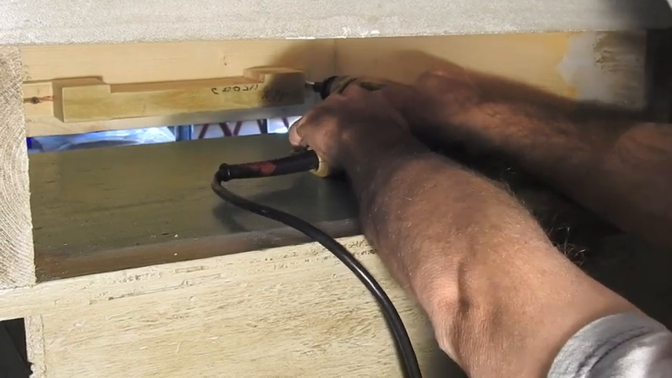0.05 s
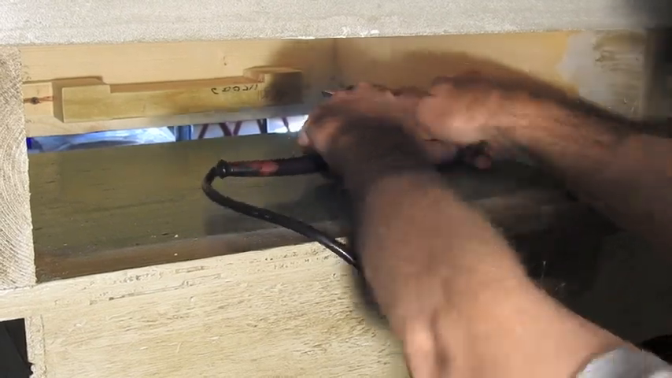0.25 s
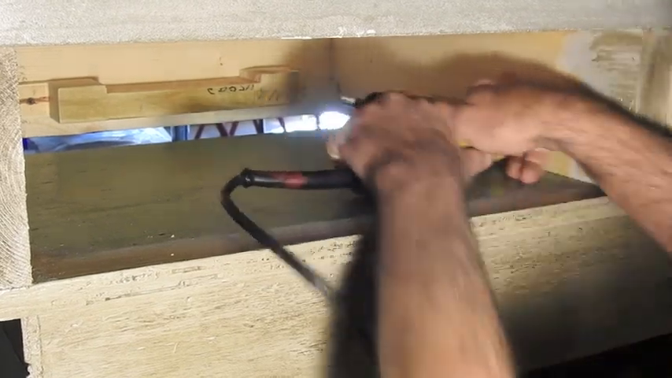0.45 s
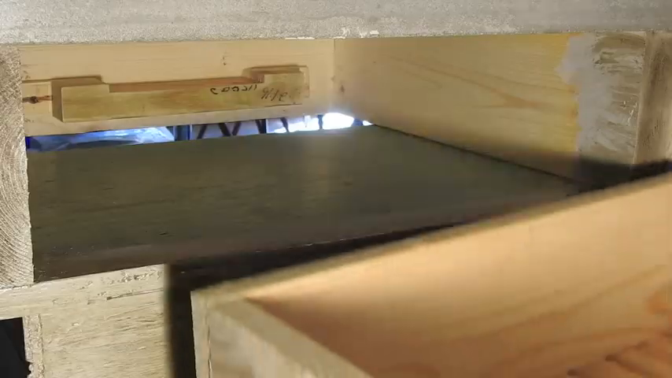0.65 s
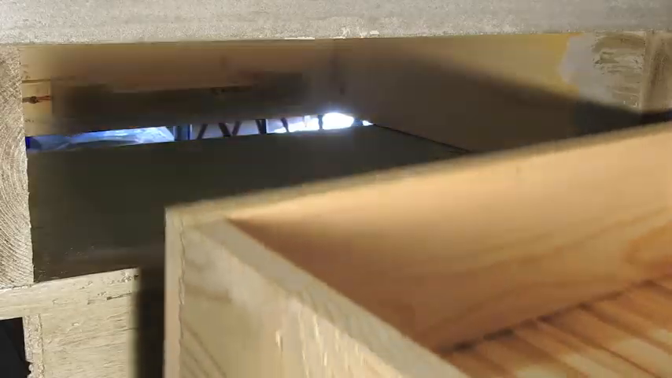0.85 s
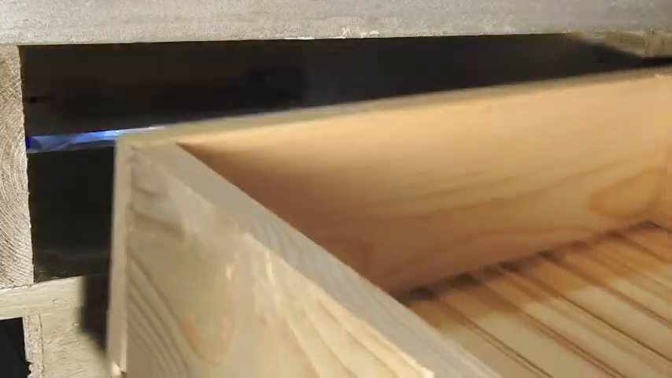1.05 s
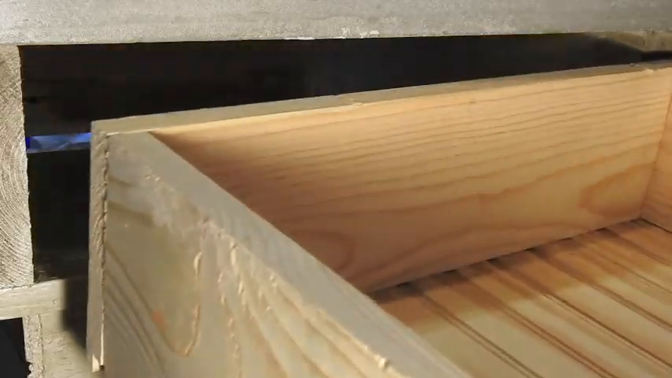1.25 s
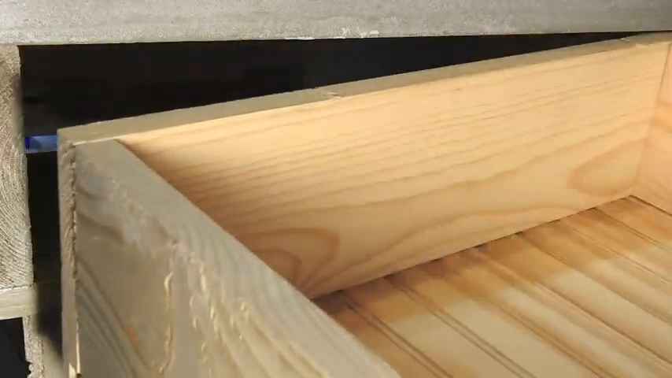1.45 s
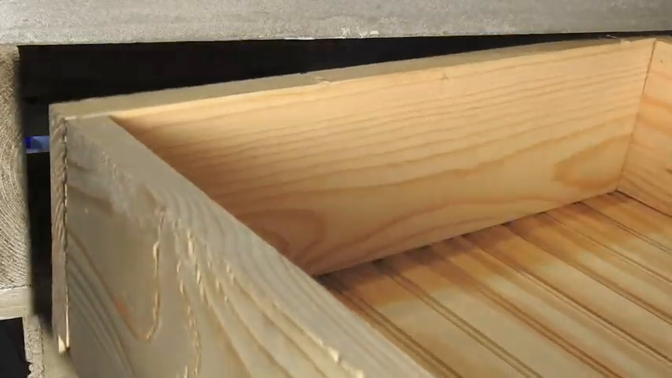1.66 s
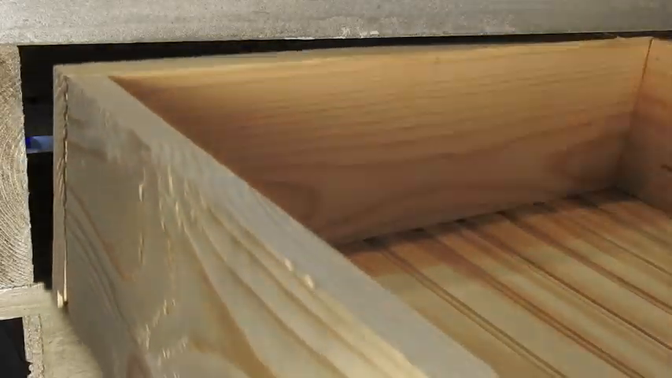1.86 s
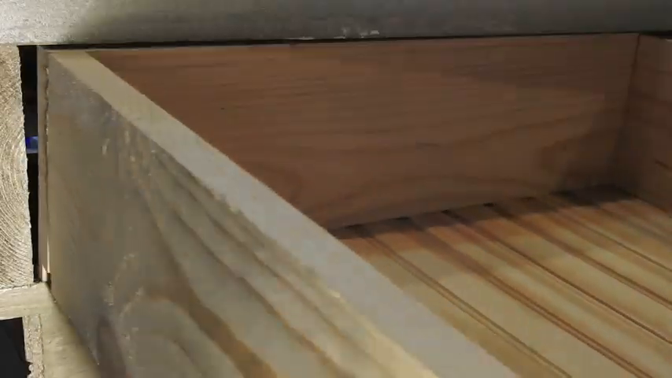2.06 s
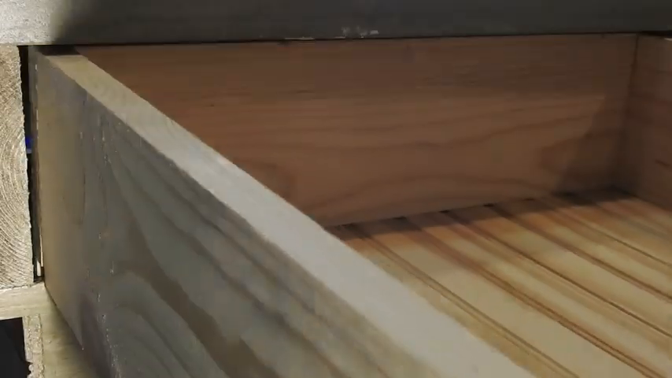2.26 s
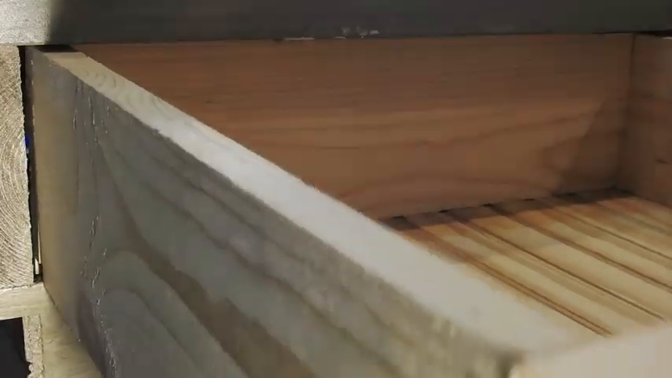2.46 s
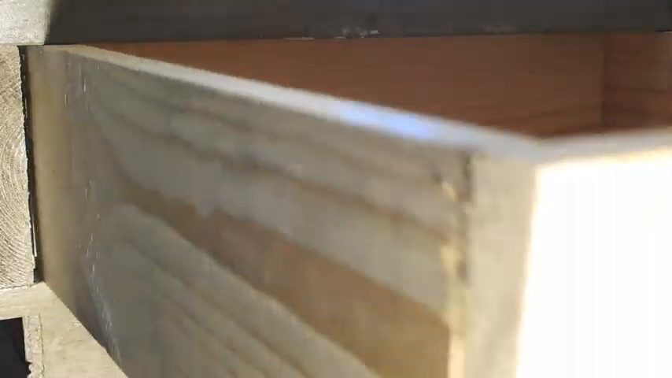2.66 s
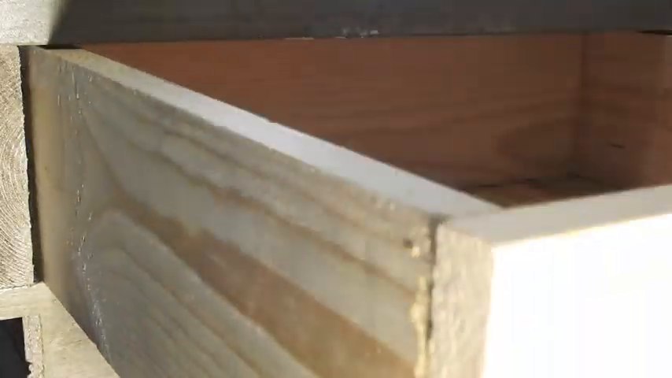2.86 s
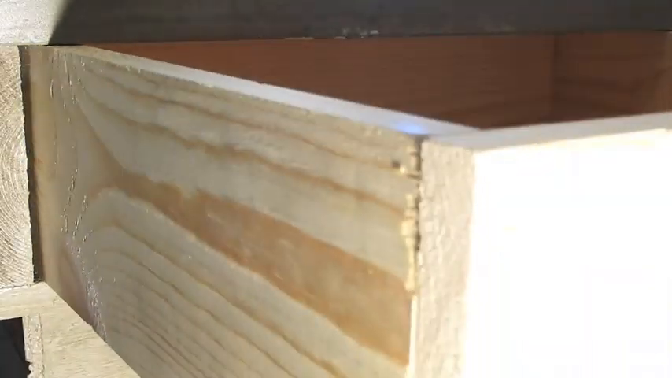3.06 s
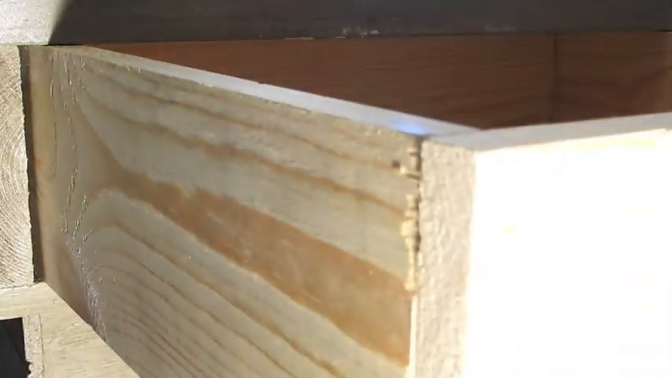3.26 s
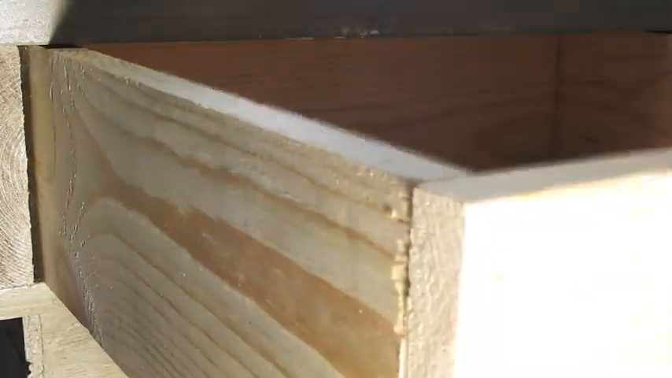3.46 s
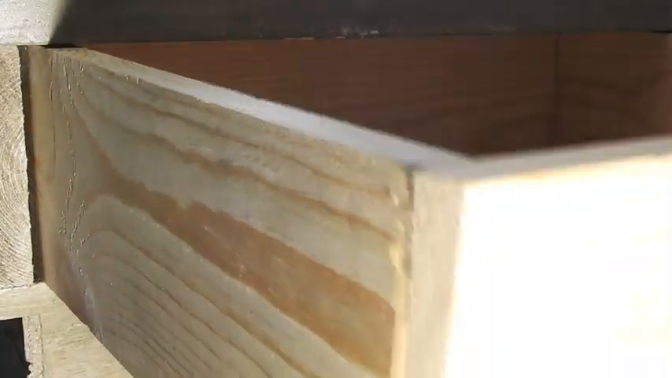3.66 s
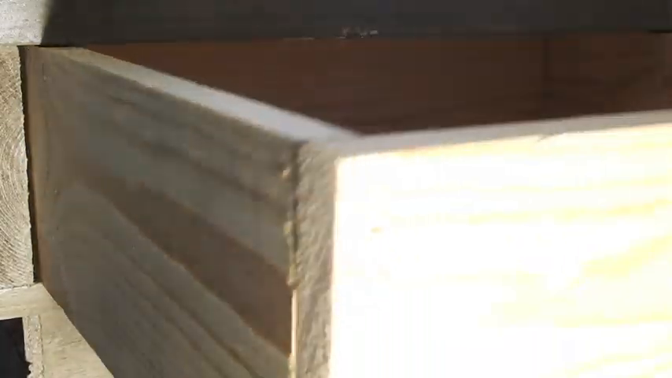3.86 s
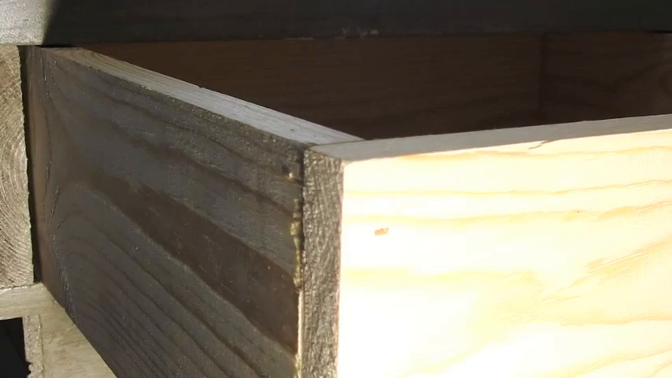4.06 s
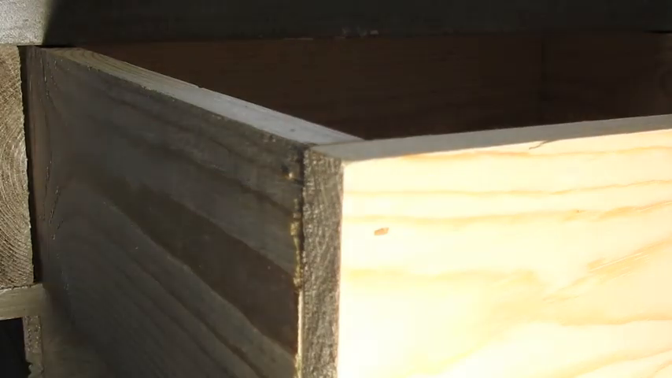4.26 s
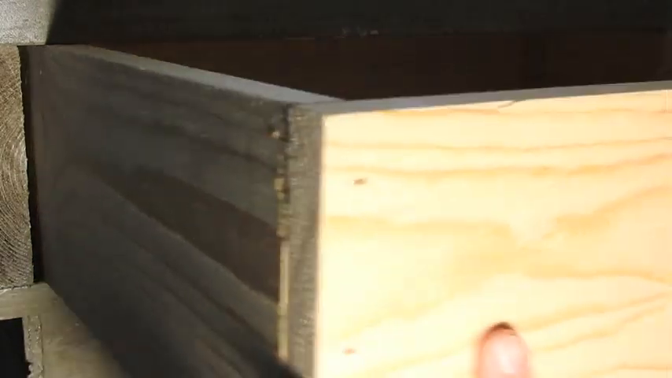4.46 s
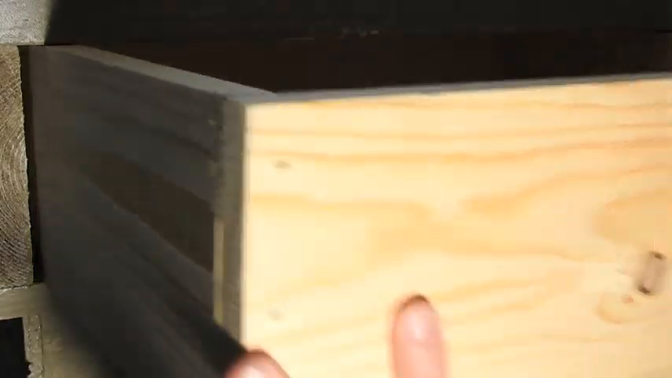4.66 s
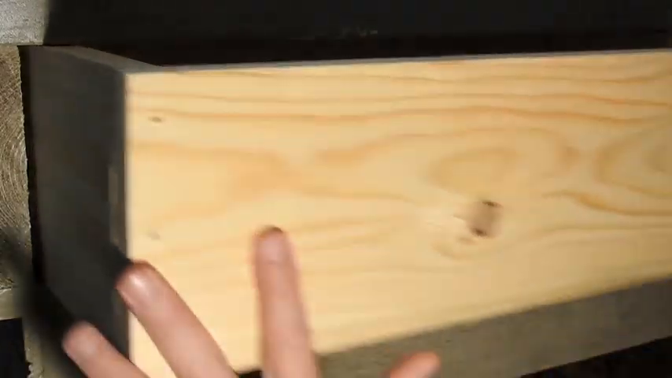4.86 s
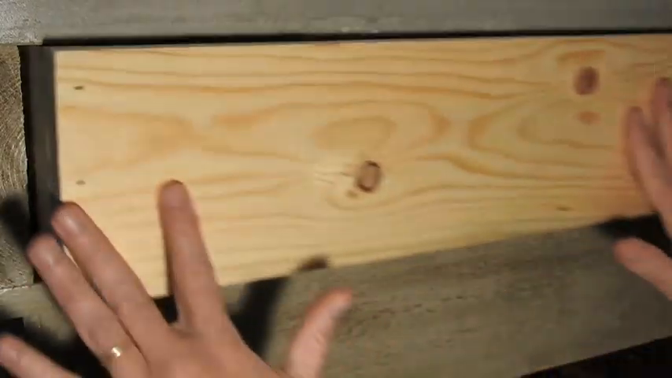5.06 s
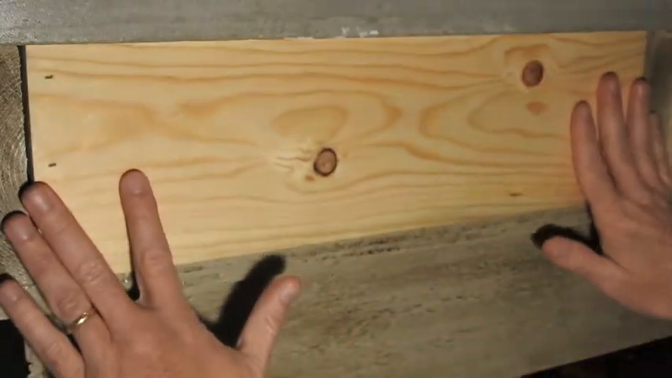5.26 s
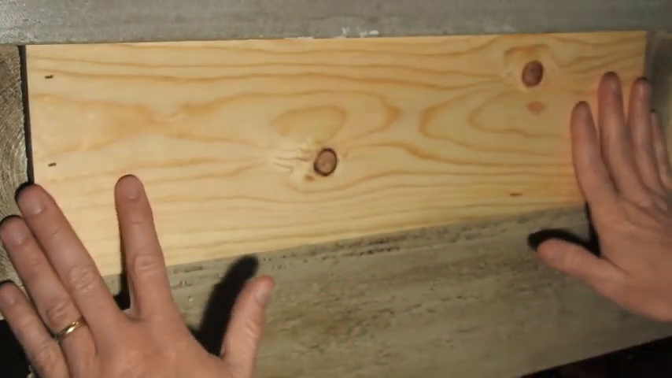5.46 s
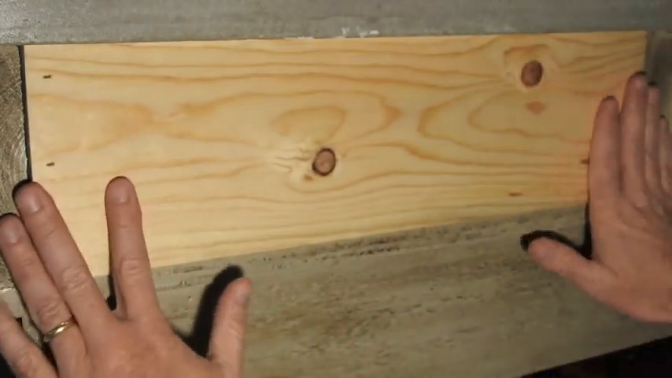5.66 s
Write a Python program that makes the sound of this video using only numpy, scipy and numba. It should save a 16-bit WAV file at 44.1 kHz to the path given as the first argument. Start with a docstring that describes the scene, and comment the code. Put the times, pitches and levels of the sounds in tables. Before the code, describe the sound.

A tool clatters and scrapes briefly inside a wooden frame, and the sound drops out for an instant. After a short lull, a wooden drawer bumps against its opening with hollow, boomy knocks. It is then pushed in through a run of jerky strokes, rubbing with a grainy hiss and knocking repeatedly until it is home. The microphone is close, in a quiet workshop with a faint low hum.

```python
"""A quiet workshop: a tool clatters inside a wooden frame and the sound briefly drops out;
then a wooden drawer is bumped and pushed home.
Knocks and stick-slip rubbing ring the hollow box, its boards and its edges; the bench thuds below.
Rough grain hisses as the wood is rubbed, over workshop air with a low hum.
A small stereo microphone with a quick limiter stands close by."""
import sys
import numpy as np
from scipy import signal
from scipy.fft import rfft, irfft, next_fast_len
from scipy.io import wavfile
from scipy.ndimage import uniform_filter1d
from numba import njit

SR = 44100
rng = np.random.default_rng(int(sys.argv[2]) if len(sys.argv) > 2 else 0)


def bounce(signal):
    """Save signal as a 16-bit WAV file at the path given by the first command-line argument."""
    frames = np.transpose(np.atleast_2d(signal))
    limited = np.clip(frames, -1, 1)
    pcm = np.round(limited * 32767).astype(np.int16)
    wavfile.write(sys.argv[1], SR, pcm)


N = 252336
TIME_S = np.arange(N) / SR


def undb(db):
    return 10 ** (np.asarray(db) / 20)


def unit_rms(x):
    return x / np.sqrt(np.mean(x ** 2))


def colour(x, points):
    """Filter by (freq_hz, gain_db) points."""
    hz, db = np.transpose(points)
    size = next_fast_len(len(x))
    bins_hz = np.maximum(np.arange(size // 2 + 1) * SR / size, 1)
    gain = undb(np.interp(np.log(bins_hz), np.log(hz), db))
    return irfft(rfft(x, size) * gain, size)[:len(x)]


def walk(rate_hz):
    """Random levels joined by ramps; spread near 1."""
    step = int(SR / rate_hz)
    return uniform_filter1d(np.repeat(rng.standard_normal(N // step + 1), step), step)[:N]


@njit
def bandpass(x, centre_hz, width_hz):
    """Resonant band with a moving centre."""
    y, band, low = np.empty(len(x)), 0., 0.
    for i in range(len(x)):
        g, damping = np.tan(np.pi * centre_hz[i] / SR), width_hz / centre_hz[i]
        v = (band + g * (x[i] - low)) / (1 + g * (g + damping))
        band, low, y[i] = 2 * v - band, low + 2 * g * v, damping * v
    return y


def soften(x, push_s):
    """Contact spreads each impulse into a short push."""
    return signal.lfilter(np.hanning(int(push_s * SR) + 3), 1, x)


def slips(rate_hz, spread_db, push_s):
    """Stick-slip force: irregular jerks of uneven size."""
    chance, size, sign = rng.random(N), rng.exponential(1, N), np.sign(rng.standard_normal(N))
    jerks = (chance < rate_hz / SR) * undb(spread_db * np.minimum(size, 2.5)) * sign
    return unit_rms(soften(jerks, push_s))


def rubbed(modes, force, wander_db):
    """Jerks ring damped modes; each mode's share wanders as the contact point moves."""
    out = np.zeros(N)
    for hz, db, t60_s in modes:
        r, w = np.exp(-np.log(1000) / (t60_s * SR)), 2 * np.pi * hz / SR
        drive = force * undb(wander_db * walk(15))
        ring = signal.lfilter([0, r * np.sin(w)], [1, -2 * r * np.cos(w), r * r], drive)
        out += undb(db) * ring / np.sqrt(t60_s)
    return unit_rms(out)


# carcass modes: pitch_hz, level_db, t60_s
CARCASS_MODES = [(111.5, -6.5, 0.99), (138.8, -2.5, 0.2), (210, -9, 0.21)]


def hollow_boom(judder, pitch_hz):
    """Judder rings the hollow of the box and its carcass."""
    hollow = unit_rms(bandpass(bandpass(judder, pitch_hz, 46.), pitch_hz, 210.))
    return unit_rms(hollow + undb(-6.5) * rubbed(CARCASS_MODES, judder, wander_db=2.7))


# bench modes: pitch_hz, level_db, t60_s
BENCH_MODES = [(67, -26.5, 0.87), (71.94, 11.5, 0.94), (74, -12, 0.9)]


def bench_thud():
    """Soft jerks ring the bench under the frame."""
    return rubbed(BENCH_MODES, slips(1500, 0.65, 0.003), wander_db=1.5)


# broad board modes: pitch_hz, level_db, t60_s
BOARD_MODES = [(283, 0.5, 0.32), (343, 4.5, 0.22), (426, -9, 0.29), (480, -1.5, 0.12), (524.5, 3, 0.091),
               (573.4, -3, 0.13), (665.7, -8, 0.12)]


def board_ring(rumble, lead_hz, lead_db):
    """The boards ring together with a moving band for the one under the hand."""
    others = rubbed(BOARD_MODES, rumble, wander_db=4.4)
    lead = undb(lead_db) * unit_rms(bandpass(rumble, lead_hz, 65.))
    return (others + lead) / np.hypot(1, undb(lead_db))


# stiff edge modes: pitch_hz, level_db, t60_s
EDGE_MODES = [(851, 0, 0.092), (905, -2.5, 0.11), (1094.6, -3.5, 0.2), (1258, 1, 0.027), (1484, 1, 0.031),
              (1610, -3.5, 0.041), (1838, -6.5, 0.07), (2170, -10, 0.1), (2465, -20.5, 0.067),
              (2770, -7, 0.07)]


def edge_ring(chatter):
    """Chatter rings the edges; a broad band stands for their many faint modes."""
    faint = bandpass(bandpass(chatter, np.full(N, 1500.), 1600.), np.full(N, 1700.), 2100.)
    return unit_rms(rubbed(EDGE_MODES, chatter, wander_db=4.5) + undb(-1.5) * unit_rms(faint))


# thin panel modes: pitch_hz, level_db, t60_s
PANEL_MODES = [(979.7, 4, 0.15), (987, -7, 0.067), (1034, -19, 0.16)]


def panel_ring():
    """Dense slips ring one thin panel clearly."""
    return rubbed(PANEL_MODES, slips(6000, 0.69, 0.0009), wander_db=1.0)


# scraping grain spectrum: freq_hz, density_db
GRAIN_SPECTRUM = [(530, -99), (900, -12.5), (1310, -21), (1550, -12), (2470, -9.5), (4100, -15),
                  (6640, -2.5), (7310, -8.5), (10600, -32.5), (16000, -49)]


def grain_hiss(scrape_db):
    """Grain catches in quick bursts: a wide hiss and a narrower scrape."""
    bursts = undb(1.1 * walk(40) + 1.25 * walk(250))
    grain = colour(slips(9000, 4.9, 0) * bursts, GRAIN_SPECTRUM)
    scrape_hz, hiss_hz = np.full(N, 4200.), np.full(N, 6800.)
    scrape = unit_rms(bandpass(bandpass(grain, scrape_hz, 2000.), scrape_hz, 2600.))
    return unit_rms(bandpass(grain, hiss_hz, 8300.)) + undb(scrape_db) * scrape


# rubbing, one list per stroke: time_s, boom_db, boards_db, hiss_db
STROKES = [
    [(0.0, -25, -35.5, -30), (0.094, -50, -46, -42.5), (0.13, -32.5, -45, -47)],
    [(0.156, -33, -20, -43), (0.164, -31, -34.5, -33), (0.19, -26, -23, -37)],
    [(1.435, -51, -64, -41), (1.475, -65, -58, -37.5), (1.49, -44, -38.5, -37)],
    [(1.513, -12, -25, -48), (1.527, -6, -33.5, -43.5), (1.6, -16.5, -48, -44.5)],
    [(1.815, -17, -32, -61), (1.819, -6.5, -35, -46.5), (1.865, -24, -51, -58)],
    [(1.886, -14, -46, -42), (1.942, -19.5, -51, -59), (1.95, -29, -53, -58)],
    [(2.502, -46, -26, -44), (2.53, -44, -27, -46), (2.545, -32, -26.5, -39)],
    [(3.394, -26, -29, -31), (3.478, -54, -58, -60), (3.5, -33, -37, -41)],
    [(4.322, -24.5, -35, -41), (4.376, -29, -59, -39.5), (4.43, -29, -34, -38)],
    [(5.689, -32, -12, -56), (5.697, -20, -19.5, -56), (5.72, -36, -22, -54)],
    [(1.168, -29, -40, -48), (1.224, -30.5, -53, -60), (1.252, -35, -67, -64), (1.282, -45, -54, -38.5),
     (1.41, -52, -63, -61)],
    [(1.62, -2, -32, -48), (1.678, -33.5, -49, -50), (1.702, -21, -47, -60), (1.712, -20, -48, -53),
     (1.79, -38, -69, -68)],
    [(1.969, -14.5, -28.5, -54), (1.999, -10, -36, -57), (2.037, -20, -33, -37.5), (2.047, -17.5, -55, -49),
     (2.08, -30, -37, -40)],
    [(2.101, -24, -14.5, -32.5), (2.141, -20.5, -22.5, -43.5), (2.179, -23, -24.5, -42.5),
     (2.197, -18.5, -31.5, -50), (2.245, -30, -32, -45.5)],
    [(2.283, -42, -15.5, -23), (2.319, -24, -10.5, -24.5), (2.369, -36, -20.5, -33),
     (2.421, -16.5, -26.5, -42), (2.48, -39, -35.5, -47)],
    [(3.055, -8.5, -26.5, -29), (3.129, -8, -18, -21.5), (3.177, -12.5, -27.5, -28),
     (3.247, -32.5, -37, -37.5), (3.37, -45, -46, -55)],
    [(3.53, -25, -1.5, -39), (3.536, -11, -14, -54), (3.604, -11.5, -23.5, -59), (3.724, -38, -34.5, -43.5),
     (3.765, -25, -30, -38)],
    [(4.458, -20, -22, -32), (4.478, -15, -12.5, -26.5), (4.526, -10.5, -19, -31.5),
     (4.566, -15.5, -22, -32), (4.615, -20.5, -17, -25)],
    [(0.205, -22, -21, -49), (0.219, -11.5, -27, -40), (0.271, -8.5, -22, -32.5), (0.365, -24, -27, -32.5),
     (0.423, -18, -25.5, -34), (0.475, -40, -33, -35), (0.507, -38, -31, -54), (0.53, -57, -67, -66)],
    [(2.562, -21, -13, -32), (2.626, -19, -14.5, -23), (2.676, -14.5, -16.5, -24.5),
     (2.792, -12, -25, -31.5), (2.836, -26, -28.5, -37), (2.886, -18.5, -36, -27.5),
     (2.95, -8.5, -16.5, -28.5), (3.035, -24, -26.5, -32)],
    [(3.79, -8.5, -7, -43.5), (3.95, -17, -21, -32), (3.968, -5.5, -19, -31), (3.994, -10.5, -28, -39.5),
     (4.046, -25, -33.5, -44), (4.124, -31.5, -36, -32.5), (4.188, -45, -68, -57), (4.29, -61, -67, -75.5)],
    [(4.634, -18, -16, -42), (4.642, -8, -17, -31), (4.714, -11, -18.5, -26.5), (4.73, -10.5, -23, -34.5),
     (4.758, -10, -17, -29.5), (4.812, -5.5, -21, -25), (4.84, -8, -25, -25.5), (4.885, -9, -21, -26)],
    [(4.89, -16, -16, -27), (4.914, -13, -24.5, -22), (4.948, -17, -22, -23.5), (4.99, -23.5, -25, -27.5),
     (5.16, -15.5, -26, -29), (5.19, -19, -30, -33), (5.218, -7.5, -35, -31), (5.24, -19, -28, -35)],
    [(5.262, -25, -18, -34), (5.272, -21, -23.5, -25), (5.292, -8.5, -11.5, -38),
     (5.324, -11.5, -11, -28.5), (5.384, -13, -13.5, -31.5), (5.5, -31.5, -27.5, -44.5),
     (5.616, -41, -41.5, -41.5), (5.66, -49, -45, -51)],
]


def stroke_levels_db(hold_s=.045):
    """Boom follows weight on the frame, boards chatter, hiss speed; silent between strokes."""
    levels_db = np.full((3, N), -100.)
    for time_s, *columns in map(np.transpose, sorted(STROKES)):
        inside = (TIME_S >= time_s[0]) & (TIME_S <= time_s[-1] + hold_s)
        levels_db[:, inside] = [np.interp(TIME_S[inside], time_s, db) for db in columns]
    return uniform_filter1d(levels_db, size=40)


# tone per contact point: start_s, boom_hz, lead_hz, lead_db, thud_db, edges_db, panel_db, scrape_db
CONTACTS = [(0, 201, 405, -12, -7, 7, -8, 4.5), (.15, 203, 460, 2, -12, 4, -26, 4),
            (.2, 201, 612, 7, -26, -4.5, -14, -1), (.255, 130, 628, 5.5, -20, -2.3, -16, -11.5),
            (1.16, 127, 340, 3, -2, -3.5, -0.5, -9), (1.43, 131, 440, -4, 4, -13, -25, 4),
            (1.5, 172, 287, 5, -13, -2, -17, -2.5), (1.61, 146, 285, 7, -14, -2, -15, -8),
            (1.81, 155, 292, 6, -15, -16, -12, -8), (1.88, 155, 284, 6, -6, -17, 0, -11.5),
            (1.96, 142, 308, 11, -13.5, 3, -14, 1.5), (2.09, 135, 339, 7.5, -11, 4, -11, -2),
            (2.28, 149, 392, -0.8, -6, 0.2, -4, 1), (2.49, 147, 486, -5, -24, 5.5, -2, 2),
            (2.55, 152, 530, -9.5, -22, -4, -4, -6), (2.669, 133, 504, 2.5, -11, -0.5, -5, -0.5),
            (2.75, 137, 320, 1, -4.5, -5.5, -8.5, -8.5), (3.05, 134, 312, 0.5, -20.5, -12, -12.5, -14.5),
            (3.38, 152, 458, 1, -20, 4.5, -10, -3), (3.52, 141.6, 423, 2.5, -17, -4.5, -17, -1),
            (3.78, 152, 378, -0.5, -14, -10.5, -18, -7), (3.948, 147, 299, 4, -3, -8, -16, -10.5),
            (4.31, 135, 300, -5, -7, -5.5, -18, -6), (4.45, 148, 292, 4.5, -3.5, -10, -15.5, -12),
            (4.63, 174, 273, 3, -26, -12, -25, -12), (4.78, 157.5, 304, 5, -14, -6, -9.5, -17),
            (4.88, 163, 350, -3, -19, -1.5, -10, -8.5), (5.05, 142, 318, 2, -8.5, -3.5, -14, -9),
            (5.25, 132, 538, -0.3, -2, -6.5, -18, -5.5), (5.421, 128, 427, -5, 8, -7, -18, -5),
            (5.68, 164, 330, 0, -9, -15, -12, -15)]


def contact(time_s):
    """The contact point sets pitches and level offsets."""
    rows = np.array(CONTACTS, float)
    current = np.maximum(np.searchsorted(rows[:, 0], time_s, side="right") - 1, 0)
    return rows[current].T[1:]


def rubbing(pitch_wander=0.023, edge_speed_share=0.48):
    """The tool, then the drawer, judders against the frame; the pitches waver."""
    boom_db, boards_db, hiss_db = stroke_levels_db()
    tone = uniform_filter1d(contact(TIME_S), size=200)
    boom_hz, lead_hz, lead_db, thud_db, edges_db, panel_db, scrape_db = tone
    boom_hz = boom_hz * (1 + pitch_wander * walk(17))
    lead_hz = lead_hz * (1 + pitch_wander * walk(15))
    edge_drive_db = boards_db + edge_speed_share * (hiss_db - boards_db)
    judder = slips(rate_hz=250, spread_db=1.5, push_s=0.0026)
    rumble = slips(rate_hz=700, spread_db=2.54, push_s=0.00069)
    chatter = slips(rate_hz=1500, spread_db=2.9, push_s=0.00035)
    return (undb(boom_db) * hollow_boom(judder, boom_hz)
            + undb(boom_db + thud_db) * bench_thud()
            + undb(boards_db) * board_ring(rumble, lead_hz, lead_db)
            + undb(edge_drive_db + edges_db) * edge_ring(chatter)
            + undb(boards_db + panel_db) * panel_ring()
            + undb(hiss_db) * grain_hiss(scrape_db))


# workshop air spectrum: freq_hz, density_db
AIR_SPECTRUM = [(20, -46), (45, -37.5), (62, -1), (90, -10.5), (120, 3.5), (155, -10), (205, -3),
                (260, -17), (360, -7), (440, -11.5), (480, -8.5), (560, -15), (1100, -19.5), (2500, -21.5),
                (4600, -23), (6200, -17), (7400, -21), (8600, -34), (16000, -50)]
# workshop air envelope: time_s, level_db
AIR_LEVEL = [(0, -37), (.62, -37), (.7, -41.5), (1.1, -43.5), (3.3, -37.5), (5.72, -43.5)]


def workshop_air():
    """Soft noise with a low hum, drifting in level."""
    air = unit_rms(colour(rng.standard_normal(N), AIR_SPECTRUM))
    return air * undb(np.interp(TIME_S, *np.transpose(AIR_LEVEL)) + 0.62 * walk(1.7))


def struck(modes, t, scatter, push_s):
    """Modes after a blow, peak 1; each blow lands elsewhere, scattering level and pitch."""
    ring = np.zeros(len(t))
    for (hz, db, t60_s), (boost, detune) in zip(modes, scatter):
        swing = np.sin(2 * np.pi * hz * (1 + .012 * detune) * t)
        ring += undb(db + 3.5 * boost) * swing * 1000. ** (-t / t60_s)
    ring = soften(ring, push_s)
    return ring / np.abs(ring).max()


def corner_clack(t, scatter, noise, cutoff_hz=5000, delay_s=0.00198):
    """Hard corners tick; the edges ring, roughened by loose joints and damped by pressed wood."""
    tick = 0.7 * np.sin(2 * np.pi * 1500 * t) * np.exp(-t / 0.0011) * (1 - np.exp(-t / 0.00022))
    rattle = 1 + .5 * unit_rms(uniform_filter1d(noise, size=60))
    damping = 0.73 + 1.78 * np.exp(-t / 0.021)
    edges = rattle * struck(EDGE_MODES, t, scatter, push_s=0.00014) * damping
    clack = signal.lfilter(*signal.butter(2, cutoff_hz, fs=SR), tick + edges)
    return np.roll(clack, int(delay_s * SR))


# tool and drawer blows: start_s, boards_db, boom_db, boom_hz, edges_db, crack_db
KNOCKS = [(0.163, -19, -17, 212, -39, -9), (0.201, -2.5, -4.5, 210.6, -9, -38),
          (.266, -23, -8, 196.5, -38, -35), (.409, -15, -12, 218, -25, -37),
          (1.166, -29, -17.5, 109.7, -47, -30.5), (1.446, -50, -49, 95, -51, -39),
          (1.509, -34, -3, 149.6, -22.5, -43), (1.534, -30, -6, 168.8, -28, -33),
          (1.619, -34, -8.5, 172.6, -52, -30), (1.81, -42, -8, 167, -42, -44),
          (1.883, -54, -4, 174.2, -47, -35), (1.966, -37, -6.5, 169.2, -35, -37),
          (2.098, -21, -25, 159, -14.5, -48), (2.255, -21, -18, 138, -22, -44), (2.28, 2, -20, 99, -5, -34),
          (2.293, -8, -38, 232, -28, -14), (2.498, -16.5, -26, 136, -29, -45),
          (2.558, -4, -55, 217, -25, -45), (2.575, -1.5, -40, 158, -43, -37),
          (2.672, -2.5, -17, 136, -16, -14), (2.688, 1, -7, 131, -11, -22),
          (2.764, -1.5, -7, 170, -32, -22.5), (2.925, -7, -16.5, 176, -15, -13.5),
          (2.952, -12, -8, 114.4, -35, -42), (2.992, -12, -27, 179, -17, -13),
          (3.051, -11, -10.5, 177, -28, -35), (3.074, -25, -16, 146, -43, -31),
          (3.393, -26, -29, 169, -30, -25), (3.526, -2.5, -2, 146, -18.5, -29),
          (3.574, -3.5, -5, 153.5, -30, -29), (3.783, -32, -3, 194.5, -21, -58),
          (3.79, -35, -3.5, 164, -12.5, -54), (3.817, -2, -11, 154, -36, -25),
          (3.86, -6, -4, 109.8, -24, -50), (3.957, -12, -15.5, 163, -36, -44),
          (4.317, -43, -16.5, 130.5, -55, -51), (4.452, -23, -2.5, 148, -35, -21),
          (4.478, -6.5, -11, 149, -27, -19), (4.628, -2, -1.5, 192, -31, -19.5),
          (4.73, -31, -5, 125, -31, -41), (4.786, -4.5, -8.5, 107, -43, -20),
          (4.861, -15, -3, 192, -30, -40), (5.118, -22, -7.5, 126.6, -20, -38),
          (5.257, -36, -13, 100, -17, -28), (5.286, -8, -3.5, 151, -10, -38),
          (5.348, -0.5, -6.5, 115, -23, -20), (5.687, -8.5, -22, 128, -38, -48)]


def knocks(hollow_t60_s=0.27):
    """Each blow rings hollow, carcass, boards and edges, with a short crack."""
    out, t = np.zeros(N + SR), np.arange(int(.6 * SR)) / SR
    scatters = rng.standard_normal((len(KNOCKS), 3, 12, 2))
    noises = rng.standard_normal((len(KNOCKS), len(t)))
    rise = 1 - np.exp(-t / 0.001)
    for row, scatter, noise in zip(KNOCKS, scatters, noises):
        start_s, boards_db, boom_db, boom_hz, edges_db, crack_db = row
        lead_hz, lead_db = contact(start_s + .01)[1:3]
        hollow = np.sin(2 * np.pi * boom_hz * t) * 1000. ** (-t / hollow_t60_s)
        carcass = 0.13 * struck(CARCASS_MODES, t, scatter[0], push_s=0.00024)
        boards = struck([(lead_hz, 5.5 + lead_db, .15)] + BOARD_MODES, t, scatter[1], push_s=0.00053)
        crack = colour(noise, GRAIN_SPECTRUM) * np.exp(-t / 0.02) * (1 - np.exp(-t / 0.0008))
        i = int(start_s * SR)
        out[i:i + len(t)] += (undb(boom_db) * rise * (hollow + carcass)
                              + undb(boards_db) * boards
                              + undb(edges_db) * corner_clack(t, scatter[2], noise)
                              + undb(crack_db) * crack / np.abs(crack).max())
    return out[:N]


# stereo difference spectrum: freq_hz, gain_db
SIDE_SPECTRUM = [(60, -44), (110, -28), (200, -28.5), (380, -23), (700, -17.5), (1290, -15), (2380, -12),
                 (4400, -8), (8120, -3), (15000, -2.5)]


def reflections(mid, decay_s=0.011):
    """Echoes differ between the channels, mostly in the treble, and shift as things move."""
    t = np.arange(int(.2 * SR)) / SR
    echoes = rng.standard_normal((2, len(t))) * np.exp(-t / decay_s)
    blend_rad = np.cumsum(walk(8.7)) * 40 / SR
    one, two = (signal.fftconvolve(mid, echo / np.linalg.norm(echo))[:N] for echo in echoes)
    return colour(one * np.cos(blend_rad) + two * np.sin(blend_rad), SIDE_SPECTRUM)


# overall envelope: time_s, gain_db
OVERALL_GAIN = [(0, -2), (.47, -6), (0.518, -10.5), (0.533, -31), (.55, -9.5), (.6, -4.5), (5.72, -4)]


def scene(balance_db=.4):
    """A tool clatters in the frame; the sound briefly drops out; a drawer is bumped and pushed home."""
    gain = undb(np.interp(TIME_S, *np.transpose(OVERALL_GAIN)))
    mid = (rubbing() + knocks() + workshop_air()) * gain
    side = reflections(mid)
    return np.array([(mid + side) * undb(balance_db / 2), (mid - side) * undb(-balance_db / 2)])


@njit
def limiter_gain(peak, threshold, attack_s, release_s):
    """Gain falls fast above the threshold and recovers more slowly."""
    gain, envelope = np.ones(len(peak)), 0.
    for i in range(len(peak)):
        envelope += (peak[i] - envelope) / (SR * (attack_s if peak[i] > envelope else release_s))
        if envelope > threshold:
            gain[i] = threshold / envelope
    return gain


def record(dry, low_cut_hz=57, bass_hz=450, knee=.5, slope_over_knee=.15, high_cut_hz=15800):
    """Low cut, limiter, big bass swings flattened at a knee, clip, high cut."""
    dry = signal.sosfilt(signal.butter(3, low_cut_hz, "high", fs=SR, output="sos"), dry)
    held = dry * limiter_gain(np.abs(dry).max(axis=0), threshold=0.61, attack_s=0.0016, release_s=.012)
    bass = signal.sosfiltfilt(signal.butter(2, bass_hz, fs=SR, output="sos"), held)
    bent = held - (1 - slope_over_knee) * (bass - np.clip(bass, -knee, knee))
    high_cut = signal.ellip(10, .2, 80, high_cut_hz, fs=SR, output="sos")
    return signal.sosfilt(high_cut, np.clip(bent, -.97, .97))


dry = scene()
out = record(dry)
bounce(out)
```